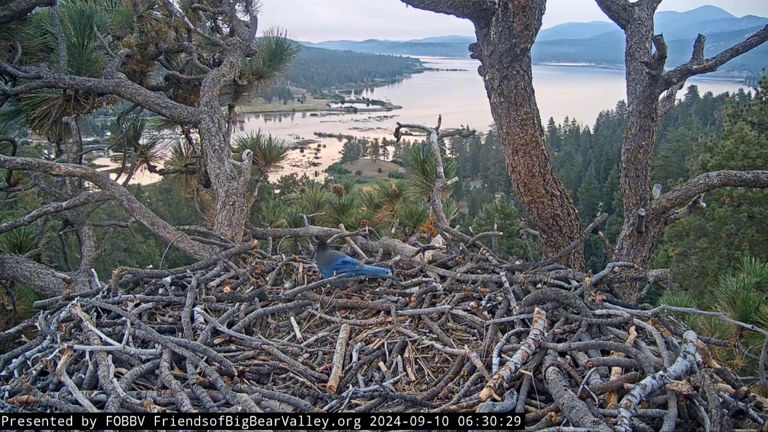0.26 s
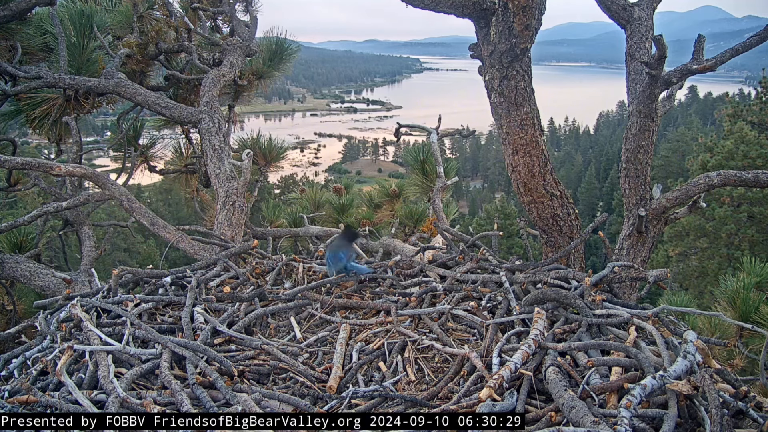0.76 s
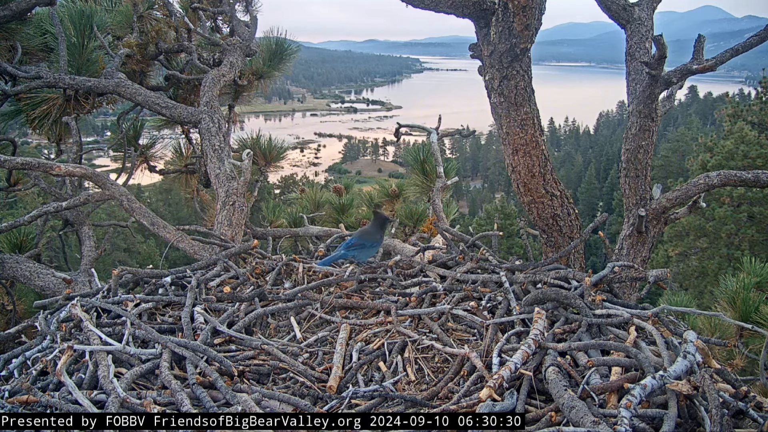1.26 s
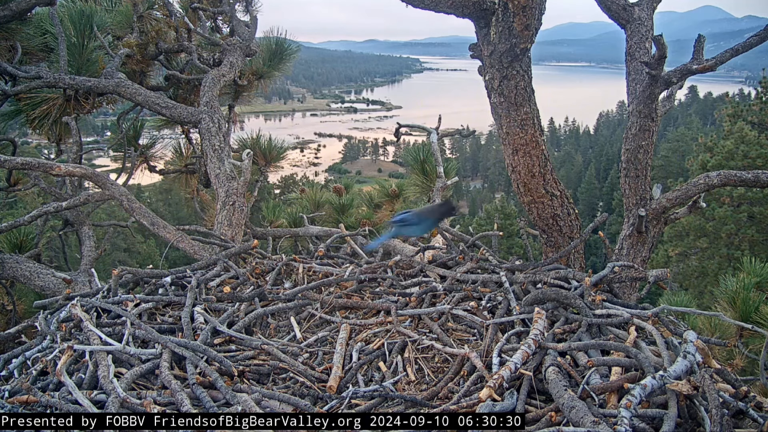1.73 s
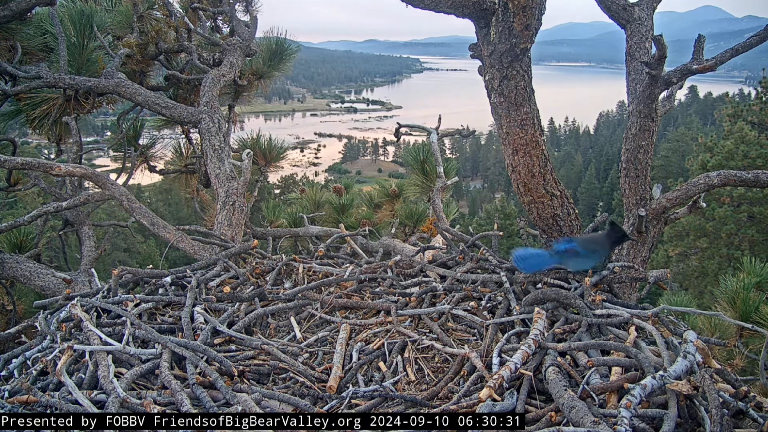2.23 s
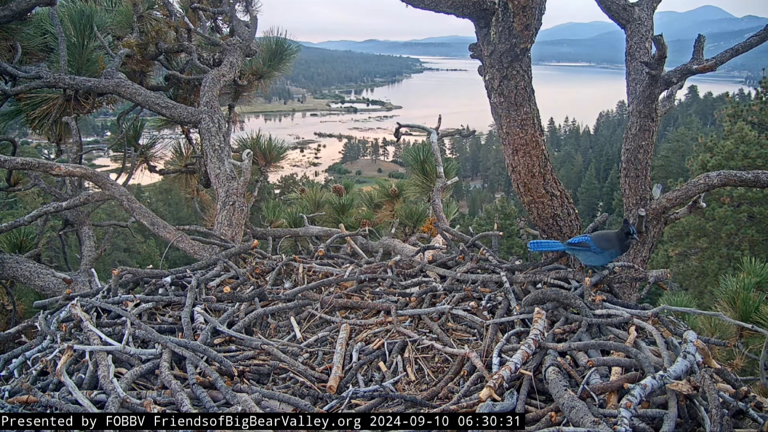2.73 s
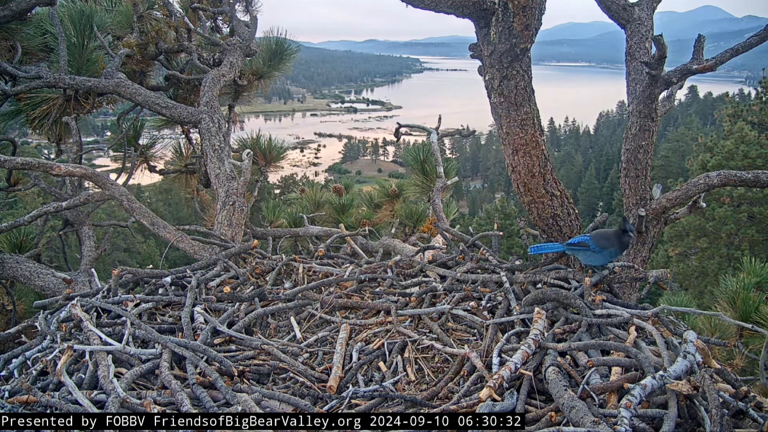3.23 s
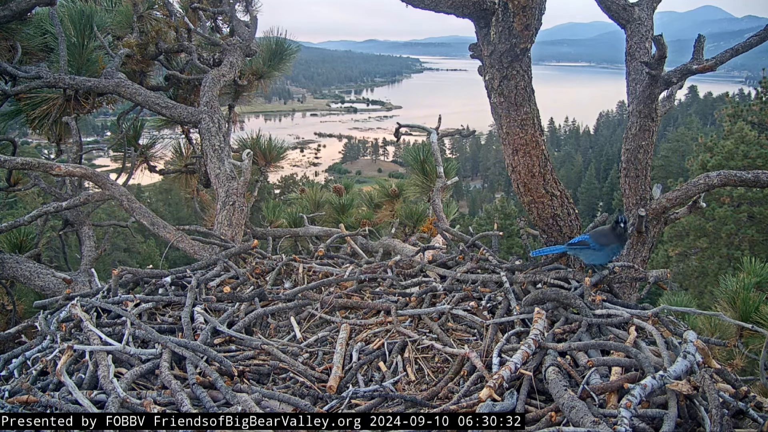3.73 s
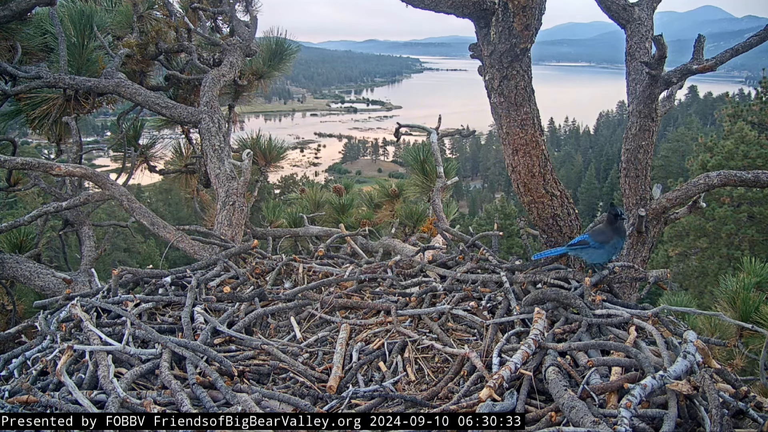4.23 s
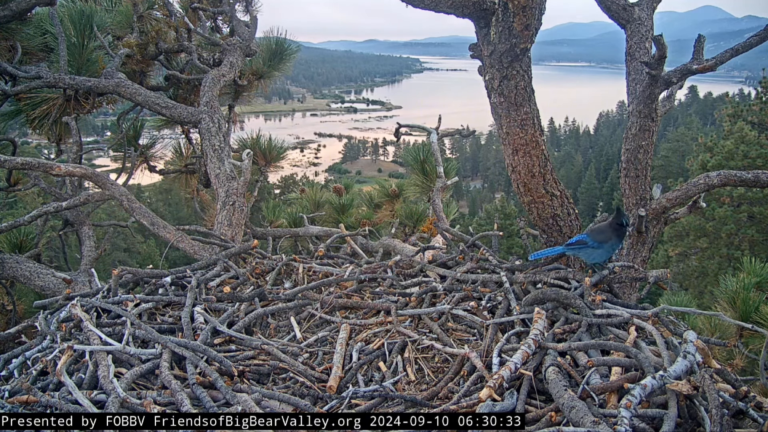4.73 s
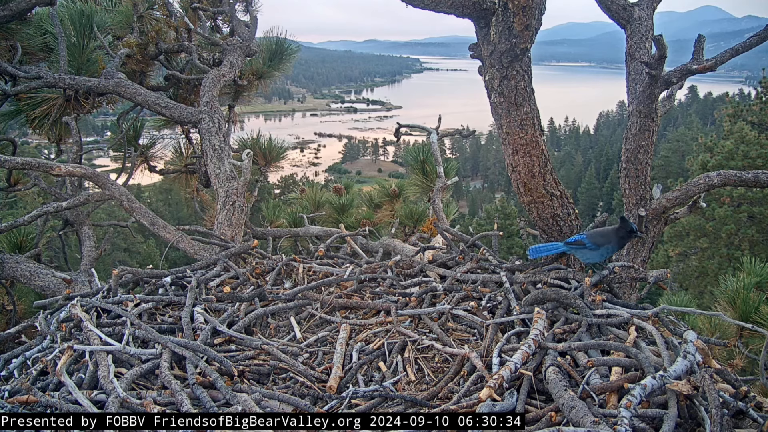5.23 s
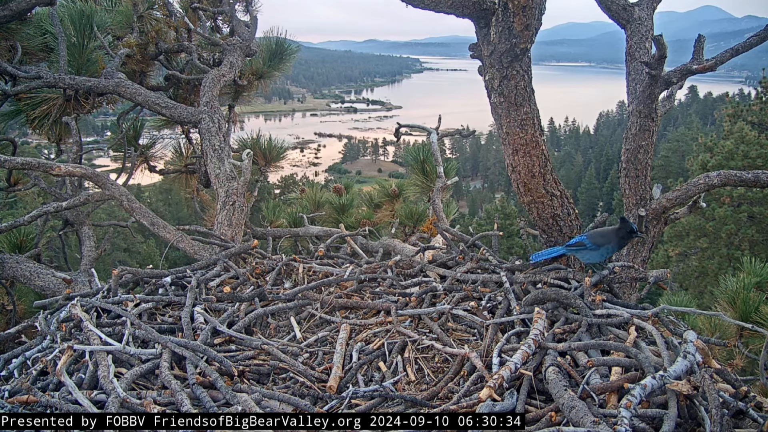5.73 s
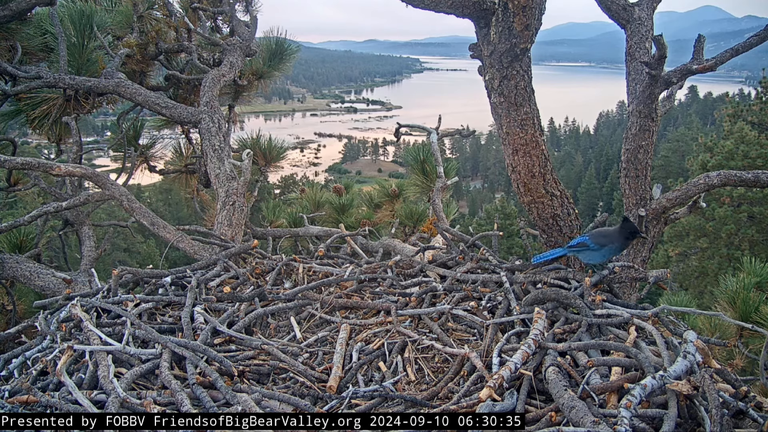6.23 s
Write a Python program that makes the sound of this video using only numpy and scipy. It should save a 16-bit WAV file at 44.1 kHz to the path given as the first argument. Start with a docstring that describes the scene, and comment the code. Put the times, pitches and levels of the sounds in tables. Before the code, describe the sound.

In a quiet forest, a jay close to the microphone makes soft nasal notes and thin whistles while twigs rustle lightly. It then gives two light calls and a fast run of eight harsh ones. A second jay answers more faintly from farther off, with a small dull knock on a branch in between. The near jay fires six more harsh calls. A distant engine drones faintly throughout.

```python
"""A far piston engine drones under a faint forest hiss throughout. First come soft nasal notes, thin
whistles and rustling twigs. From 1.35 s a jay on a treetop nest, close by, gives two light calls and
eight harsh ones, each a whistle and a rasp sung at once. A second jay answers twice from farther off,
the first hops on a branch, and the far one calls six more times. Near 5 s the nest jay fires six more
harsh calls, and a few soft notes and a rustle end the scene."""
import sys
import numpy as np
from scipy import signal
from scipy.fft import rfft, irfft, next_fast_len
from scipy.io import wavfile
from scipy.ndimage import map_coordinates

SR = 44100
rng = np.random.default_rng(int(sys.argv[2]) if len(sys.argv) > 2 else 0)


def bounce(signal):
    """Save signal as a 16-bit WAV file at the path given by the first command-line argument."""
    frames = np.transpose(np.atleast_2d(signal))
    limited = np.clip(frames, -1, 1)
    pcm = np.round(limited * 32767).astype(np.int16)
    wavfile.write(sys.argv[1], SR, pcm)


N = 286209


def amp(db):
    """Turn decibels (dB) into a number to multiply a sound by."""
    return 10 ** (np.asarray(db) / 20)


def unit(x):
    """Scale a sound to an average (rms) level of 1."""
    return x / np.sqrt(np.mean(x ** 2) + 1e-20)


def along(points, hz):
    """Read between rows of (Hz, value), with octaves evenly spaced."""
    f, v = np.transpose(points)
    return np.interp(np.log(hz + 1), np.log(f + 1), v)


def curve(rows, t):
    """Read between rows of (seconds, value) at times t."""
    return np.interp(t, *np.transpose(rows))


def wobble(rate, n):
    """A smooth random curve of n samples, through rate random points a second."""
    return map_coordinates(rng.standard_normal(int(n * rate / SR) + 4), [np.arange(n) * rate / SR])


def swell(t, at_s, width_s):
    """A smooth hump of height 1."""
    return np.exp(-((t - at_s) / width_s) ** 2)


def filtered(x, response):
    """Multiply each frequency f in a sound by response(f)."""
    size = next_fast_len(len(x) + 4096)
    return irfft(rfft(x, size) * response(np.fft.rfftfreq(size, 1 / SR)), size)[:len(x)]


def colour(x, spectrum):
    """Turn frequencies up or down by rows of (Hz, dB)."""
    return filtered(x, lambda f: amp(along(spectrum, f)))


def resonate(x, modes):
    """Ring a sound through resonances, rows of (Hz, width in Hz, dB); the result has level 1."""
    peak = lambda f, hz, width: (1j * f * width / (hz * hz - f * f + 1j * f * width)) ** 2
    return unit(filtered(x, lambda f: sum(amp(db) * peak(f, hz, width) for hz, width, db in modes)))


def noise(spectrum, n):
    """Coloured noise at level 1."""
    return unit(colour(rng.standard_normal(n), spectrum))


def cycle(hz):
    """The growing angle (phase) of a wave that follows a pitch curve."""
    return 2 * np.pi * np.cumsum(hz) / SR


def buzz(hz, count):
    """A train of pulses made of count equally strong harmonics."""
    return unit(np.cos(np.arange(1, count + 1)[:, None] * cycle(hz)).sum(0))


def saturate(x, top, hardness):
    """Round off peaks to stay below top, which adds odd overtones."""
    return x / (1 + np.abs(x / top) ** hardness) ** (1 / hardness)


def add(track, start, x):
    """Mix x into track from start, in seconds."""
    i = round(start * SR)
    x = x[max(-i, 0):len(track) - i]
    track[max(i, 0):][:len(x)] += x


def forest():
    """A faint, slowly swelling hiss of needles and far birds."""
    spectrum = [(500, -10.5), (950, -15), (1300, -10), (1850, 2.5), (2400, -4), (3000, -7.5), (3700, -13.5),
                (4700, -5), (6000, -15), (9000, -18), (14500, -12.5)]  # The colour of the hiss. Each row: frequency in Hz, relative level in dB.
    loudness = [(0, -46), (1.3, -46), (3.4, -53), (6.49, -50.5)]  # Its slow swell. Each row: time in seconds, level in dB.
    return amp(curve(loudness, np.arange(N) / SR) + 0.49 * wobble(18, N)) * noise(spectrum, N)


def engine():
    """A far engine fires, making tones at multiples of its speed; the air fades each in its own time."""
    speed = [(0, 29.31), (1.2, 27.9), (2.2, 26.87), (3.1, 25.3), (3.8, 25.15), (4.9, 26.28), (6.49, 27.3)]  # Each row: time in seconds, engine speed in Hz.
    harmonics = [(1, -47), (2, -35), (3, -5), (4, 6.5), (5, 5), (6, -39), (7, -23), (8, -15), (9, -13),
                 (10, -12.5), (11, -14.5), (12, -12), (13, -18), (14, -10.5), (15, -15), (16, -18.5),
                 (17, -17.5), (18, -25), (19, -43), (20, -23), (21, -29), (22, -14.5)]  # The tones. Each row: multiple of the speed, relative level in dB.
    rumble = [(25, -46), (60, -31), (80, -3), (105, 2), (150, 0.5), (200, -6.5), (300, -11), (450, -22.5),
              (650, -26), (1000, -67), (2000, -45)]  # Deep noise. Each row: frequency in Hz, relative level in dB.
    # How loud the low tones and the high tones are. Each row: time in seconds, level in dB.
    exhaust_level = [(0, -38.5), (1.3, -36.5), (2, -46), (3.8, -40.5), (4.7, -43), (5.72, -46),
                     (5.9, -36.5), (6.49, -35)]
    upper_level = [(0, -32), (.25, -33), (.5, -43), (2, -49), (3.9, -56), (4.2, -47.5), (5.5, -44.5),
                   (6.49, -40.5)]
    t = np.arange(N) / SR
    phase = cycle(curve(speed, t)) + 0.043 * wobble(7.9, N)
    tones = []
    for multiple, db in harmonics:
        fade_db = min(multiple / 3, 4) * wobble(2.965, N)  # high tones fade more
        tones.append(amp(db + fade_db) * np.sin(multiple * phase + rng.uniform(0, 2 * np.pi)))
    exhaust, drone, upper = (unit(group.sum(0)) for group in np.split(np.array(tones), [5, 7]))
    roar = resonate(rng.standard_normal(N), [(306, 410, 0)])
    upper = filtered(upper + .45 * roar, lambda f: 1 / (1 + (f / 540) ** 8))  # distance dulls the treble
    drone_db = -51.5 + 9 * swell(t, at_s=4.38, width_s=0.3)  # the middle tones swell once
    return (amp(curve(exhaust_level, t)) * exhaust + amp(drone_db) * drone
            + amp(curve(upper_level, t)) * upper + amp(-46) * noise(rumble, N))


def twigs():
    """Twigs shift under the bird in short, grainy scrapes."""
    rustles = [(0, 0.027, -39), (0.143, 0.037, -37), (0.225, 0.015, -36.5), (0.434, 0.023, -41.5),
               (0.57, 0.025, -40.5), (0.644, 0.019, -43), (1.078, 0.0074, -49), (1.083, 0.012, -40),
               (6.009, 0.031, -43.5)]  # Each row: start in seconds, length in seconds, level in dB.
    spectrum = [(600, -10), (1200, -11), (1900, 11), (2600, 0.5), (3500, -10.5), (4700, 3.5), (7000, -17),
                (14500, -25)]  # A scrape's colour. Each row: frequency in Hz, relative level in dB.
    out = np.zeros(N)
    for start, length, db in rustles:
        n = int(length * SR)
        scrape = unit(noise(spectrum, n) * amp(2.25 * wobble(426, n)))
        add(out, start, amp(db) * np.hanning(n) ** .5 * scrape)
    return out


def hops():
    """The jay's feet land on a branch, which rings with a dull knock."""
    knocks = [(3.004, -29), (3.038, -27)]  # Each row: start in seconds, level in dB.
    # The branch's tones. Each row: pitch in Hz, relative level in dB, seconds to fade by 60 dB.
    branch = [(224, 1, 0.046), (370, 0.5, 0.028), (485, -1, 0.019)]
    out = np.zeros(N)
    t = np.arange(SR // 10) / SR
    attack = 1 - np.exp(-t / 0.0016)
    for start, db in knocks:
        ring = sum(amp(level - 60 * t / fade_s) * np.sin(2 * np.pi * (hz * t + rng.random()))
                   for hz, level, fade_s in branch)
        add(out, start, amp(db) * attack * ring)
    return out


def nasal_notes():
    """A soft, breathy buzz rings a bird's throat; pitch and level rise and fall in an arch."""
    notes = [(0.018, 0.055, 458, -44.5), (0.239, .13, 427.3, -35.5), (.34, 0.045, 464, -33),
             (0.816, 0.097, 446.3, -40.5), (1.012, 0.043, 455, -40), (1.175, 0.1, 450, -37),
             (1.255, 0.1, 404, -36), (3.506, 0.093, 454, -52.5), (3.75, 0.17, 431, -50),
             (4.239, .12, 404.7, -37.5), (6.241, 0.15, 508, -50.5)]  # Each row: start in seconds, length in seconds, pitch in Hz, level in dB.
    # Throat resonances. Each row: frequency in Hz, width in Hz, relative level in dB.
    throat = [(1790, 340, 17), (2900, 1100, 3), (4540, 1100, 3)]
    out = np.zeros(N)
    for start, length, hz, db in notes:
        u = np.linspace(-1, 1, int(length * SR))  # -1 at the note's start, 1 at its end
        pitch = hz * (1 - .13 * u ** 2 - .05 * u + .016 * wobble(200, len(u)))
        voice = buzz(pitch, count=14) + .4 * rng.standard_normal(len(u))
        add(out, start, amp(db) * (1 - u ** 2) * resonate(voice, throat))
    return out


def whistles():
    """Thin, pure bird notes that rise and fall."""
    # Each row: start and length in seconds, top pitch in Hz, level in dB, arch depth as a share of pitch.
    notes = [(-.05, 0.11, 6970, -50, 0.1), (0.266, .09, 6200, -60, .1), (0.377, .11, 6820, -52, .13),
             (0.678, 0.061, 1010, -53, .1), (5.838, 0.054, 981, -56, 0.092),
             (5.955, 0.061, 3057, -50, 0.024), (6.155, 0.085, 4330, -52.5, 0.027)]
    out = np.zeros(N)
    for start, length, hz, db, arch in notes:
        u = np.linspace(-1, 1, int(length * SR))
        pitch = hz * (1 - arch * u ** 2 + 0.003 * wobble(400, len(u)))
        add(out, start, amp(db) * (1 - u ** 2) * np.sin(cycle(pitch)))
    return out


def envelope(t, peak_db, peak_s, attack_s, hold_s, sag_db, release_s):
    """Loudness over a call: it climbs 40 dB in attack_s, sags while held, falls 40 dB in release_s."""
    age = t - peak_s
    ramps = np.maximum(-age, 0) / attack_s + np.maximum(age - hold_s, 0) / release_s
    return amp(peak_db - sag_db * np.clip(age / hold_s, 0, 1) - 40 * ramps)


def bend(t, jump, rejump, top_s, climb_s):
    """What the whistle's pitch is multiplied by: it climbs, settles, jumps again and drops."""
    settle = lambda at_s, life_s: (t >= at_s) * np.exp(-np.abs(t - at_s) / life_s)
    lead_pitch, sag_per_s = .88, 1.286
    climb = lead_pitch + (1 + jump - lead_pitch) * np.exp(-np.abs(t - top_s) / climb_s)
    held = 1 + jump * settle(top_s, 0.002987) + rejump * settle(.038, 0.01017) - sag_per_s * t
    drop = 14.73 * np.maximum(t - .046, 0)  # the beak closes
    return np.where(t < top_s, climb, np.maximum(held - drop, .5))


def jay(calls, envelopes, pitch_bend, jitter, rough, pure, beak_db, chest_db, overtone_db, hum_db):
    """Two voices at once: a kinked whistle, and a lower, chaotic buzz that rings the throat and beak."""
    # Pitch of the buzz and of a squeal. Each row: seconds into an unstretched call, pitch in Hz.
    rasp_pitch = [(0, 689.1), (.022, 652), (.04, 630), (.065, 562)]
    squeal_pitch = [(0, 4533), (.018, 4748), (.04, 4563), (.05, 4350), (.06, 3904)]
    # The bird's resonances. Each row: frequency in Hz, width in Hz, relative level in dB.
    chest_modes = [(1763, 607, 3.5), (2504, 180, -1)]
    throat_modes = [(3086, 424, 13), (2678, 197, 16.5)]
    beak_modes = [(4520, 530, 3), (5127, 310, 2.5), (3996, 175, 0), (6260, 960, -13)]
    out = np.zeros(N)
    t = np.arange(-SR // 40, SR // 11) / SR
    n = len(t)
    cluck = amp(-30.5) * swell(t, at_s=-0.0153, width_s=0.0013)
    lead = cluck + amp(-4.5) * swell(t, at_s=-0.0014, width_s=0.003)  # a low chirp leads into the call
    chaos = np.clip(t / 0.022, .35, 1)  # the voice breaks up as the pressure builds
    overtones = amp(overtone_db + 2 * (t < 0))
    for start, hz, stretch, effort_db, throat_db in calls:
        age = t / stretch
        whistle_gain, throat_gain, beak_gain = (envelope(age, *row) for row in envelopes)
        waver = 1 + .028 * wobble(130, n) + jitter * chaos * wobble(699.7, n)
        phase = cycle(hz * bend(age, **pitch_bend) * waver)
        tone = np.sqrt(2) * (np.sin(phase) + overtones * (np.sin(2 * phase) + np.sin(3 * phase)))
        rasp_hz = curve(rasp_pitch, age) * (1 + .025 * rng.standard_normal() + 0.0255 * wobble(300.5, n))
        rasp = np.sqrt(1 - rough) * buzz(rasp_hz, count=20) + np.sqrt(rough) * rng.standard_normal(n)
        shake = amp(2.8 * chaos * wobble(650, n))
        low = tone * shake + amp(chest_db) * chaos * resonate(rasp, chest_modes)
        # One pure tone sounds in the beak, and its lower neighbour in the throat.
        beak_phase = cycle(curve(squeal_pitch, age) * (1 + 0.0173 * wobble(909.5, n)))
        beak = np.sqrt(1 - pure) * resonate(rasp, beak_modes) + np.sqrt(2 * pure) * np.sin(beak_phase)
        throat = np.sqrt(1 - pure) * resonate(rasp, throat_modes)
        throat += np.sqrt(2 * pure) * np.sin(beak_phase * 2 / 3)
        squeal = amp(1.5) * swell(age, at_s=0.042, width_s=0.004) * np.sin(beak_phase)
        hiss = amp(-18) * rasp  # swirling air
        high = amp(beak_db) * (beak + squeal + hiss)
        # The low voice shows as a hum when the beak closes.
        hum = amp(hum_db) * swell(t, at_s=0.055, width_s=.0099) * np.sin(cycle(rasp_hz))
        middle = (throat_gain + amp(-11) * lead) * throat + hum
        call = amp(effort_db) * ((lead + whistle_gain) * low + beak_gain * high) + amp(throat_db) * middle
        add(out, start + t[0], call)
    return out


def light_calls(calls, beak_db):
    """A jay calls without force: a purer voice with an arched start."""
    # Loudness shapes of whistle, throat and beak. Each row: peak in dB, then peak time, attack and
    # hold in seconds, sag in dB, release in seconds (all times before stretching).
    envelopes = [(4.5, 0.0041, 0.0097, 0.045, 10.2, 0.061), (4.5, 0.02, 0.015, 0.015, 1.2, 0.028),
                 (0, 0.023, 0.048, 0.026, 0.4, 0.029)]
    spectrum = [(300, -36), (1000, -37.5), (1500, -1), (4900, -0.5), (5600, -13.5), (6600, -6), (9000, -19),
                (14000, -18)]  # The calls' colour. Each row: frequency in Hz, gain in dB.
    pitch_bend = dict(jump=0.1383, rejump=0.395, top_s=0.00582, climb_s=0.00483)
    voice = jay(calls, envelopes, pitch_bend, jitter=0.062, rough=.3, pure=0.48,
                beak_db=beak_db, chest_db=-3.5, overtone_db=-25.0, hum_db=-30)
    return colour(voice, spectrum)


def harsh_calls(calls):
    """The nest jay forces its voice, and the trunk beside it throws each call back once."""
    envelopes = [(6, 0.0022, 0.0017, 0.046, 9, .028), (3, .019, 0.026, 0.019, 2.5, 0.015),
                 (0, 0.022, 0.027, 0.022, -0.5, .026)]  # Loudness shapes of whistle, throat and beak; columns as in light_calls.
    path = [(25, -23), (60, -20), (300, -5.5), (600, -13), (950, -15.5), (1400, -9.5), (1900, -4.5),
            (3000, 0), (5300, 0), (8000, -0.5), (14000, 8.5)]  # From bird to microphone. Each row: frequency in Hz, gain in dB.
    pitch_bend = dict(jump=0.1611, rejump=0.153, top_s=0.001916, climb_s=0.000563)
    voice = jay(calls, envelopes, pitch_bend, jitter=0.0523, rough=0.73, pure=0.038,
                beak_db=-7.5, chest_db=-4.0, overtone_db=-30.5, hum_db=-9.0)
    voice = colour(saturate(voice, top=0.75, hardness=8.4), path)  # the loudest calls turn brassy
    t = np.arange(N) / SR
    accent_db = 2 * sum(swell(t, at_s=start + 0.0055, width_s=0.0029) for start, *_ in calls)
    flutter_db = .8 * wobble(900, N)  # roughens the voice
    voice *= amp(accent_db + flutter_db)
    trunk_db, trunk_delay_s = -20, 0.016
    return filtered(voice, lambda f: 1 + amp(trunk_db) * np.exp(-2j * np.pi * f * trunk_delay_s))


def echo(x):
    """The surrounding trees scatter the sound back; the treble dies first."""
    fade_times = [(300, 0.66), (2000, 0.81), (5000, 0.53), (12000, 0.4)]  # Each row: frequency in Hz, seconds for the echo to fade by 60 dB.
    hz, t, bands = signal.stft(rng.standard_normal(SR), SR, nperseg=256)
    tail = signal.istft(bands * amp(-60 * t / along(fade_times, hz)[:, None]), SR, nperseg=256)[1]
    delayed_tail = np.pad(tail / np.linalg.norm(tail), (SR // 100, 0))
    return signal.fftconvolve(x, delayed_tail)[:N]


def scene():
    """Both jays and the small sounds among the trees, over engine and forest."""
    # The nest jay's harsh and opening calls, and the far jay's answers. Each row: start in seconds,
    # base pitch in Hz, stretch (1 is normal length), effort in dB, throat rasp in dB.
    shouts = [(1.6113, 1853, 1.06, -7, -13), (1.7485, 1817, 1.0, -6, -14.5),
              (1.8862, 1880, .95, -6.5, -6.5), (2.0249, 1806, 0.99, -1.5, -12),
              (2.1591, 1851, 1.02, -1, -6.5), (2.2998, 1821, 0.95, 0.5, -13.5),
              (2.438, 1841, 0.95, 3.5, -9), (2.5811, 1807, 0.99, 1.5, -9.5), (4.9795, 1787, 0.94, 4.5, -10),
              (5.1205, 1764, 0.94, 3, -14), (5.261, 1789, 0.92, 4, -11.5), (5.4002, 1804, 0.94, 5, -9.5),
              (5.547, 1803, 0.96, 4, -12), (5.694, 1810, 0.93, 3.5, -12.5)]
    openers = [(1.3524, 1810, 0.99, -19, -23.5), (1.4896, 1834, 0.896, -20.5, -26.5)]
    answers = [(2.7442, 1773, 1, -34, -39.5), (2.8854, 1757, 1.0, -34, -42),
               (3.866, 1777, 0.94, -35, -40.5), (4.001, 1825, 0.82, -35, -41),
               (4.138, 1838, .92, -36.5, -45), (4.276, 1865, 0.94, -36.5, -46.5),
               (4.418, 1818, 0.94, -36.5, -47), (4.559, 1857, 1, -37.5, -47)]
    near = harsh_calls(shouts)
    opening = light_calls(openers, beak_db=3.0)
    far = light_calls(answers, beak_db=-6)
    small = nasal_notes() + whistles() + twigs() + hops()
    # The farther the source, the more of it is echo.
    echoes = echo(amp(-26.5) * near + amp(-23) * opening + amp(-6.5) * far + amp(-10.0) * small)
    return (near + opening + far + small + echoes + engine() + forest())[None]


def record(dry):
    """Gain control turns loud calls down, the housing colours and smears them, and peaks are rounded."""
    microphone = [(25, -5), (80, 0), (1800, 1.5), (4000, 2), (5400, 2), (7300, 0), (9000, -1.5),
                  (11200, -9), (13200, -10.5), (14400, -11.5), (15200, -43)]  # Its colour in the housing. Each row: frequency in Hz, gain in dB.
    reaction_s, top_hz = 0.075, 15757
    x = dry[0]
    memory = np.exp(-1 / (reaction_s * SR))
    power = np.abs(signal.lfilter([1 - memory], [1, -memory], x ** 2))
    ducked = x * (1 + power / 0.018) ** -.22  # each call's first milliseconds slip through
    smear = lambda f: (3000 - 1j * f) / (3000 + 1j * f)  # delays low frequencies more than high ones
    coloured = filtered(ducked, lambda f: amp(along(microphone, f)) * smear(f))
    rounded = saturate(coloured, top=0.96, hardness=10)
    return filtered(rounded, lambda f: f < top_hz)[None]


dry = scene()
out = record(dry)
bounce(out)
```